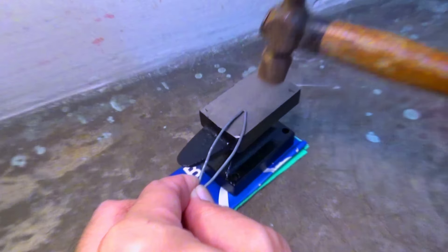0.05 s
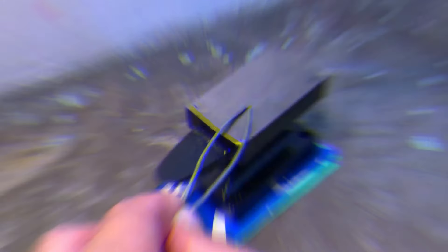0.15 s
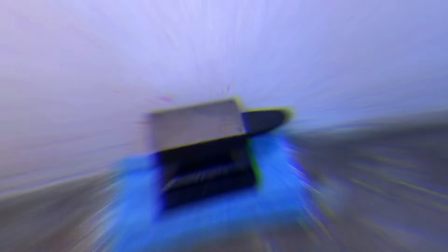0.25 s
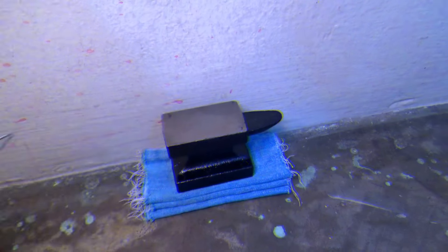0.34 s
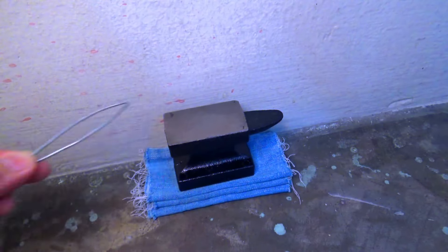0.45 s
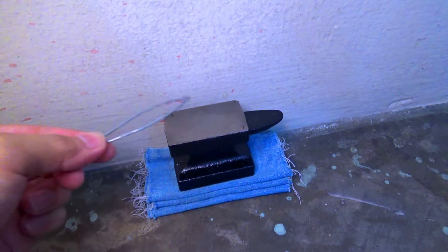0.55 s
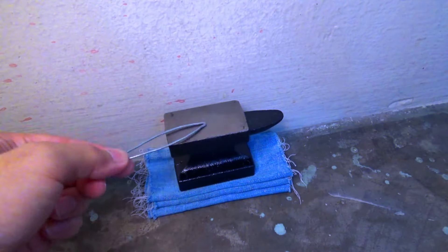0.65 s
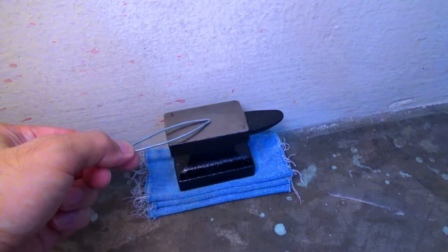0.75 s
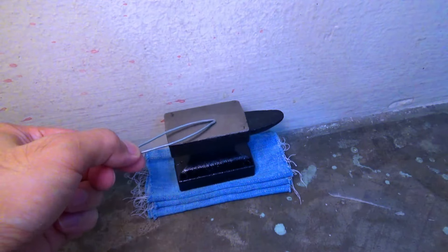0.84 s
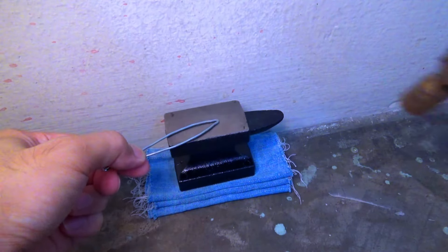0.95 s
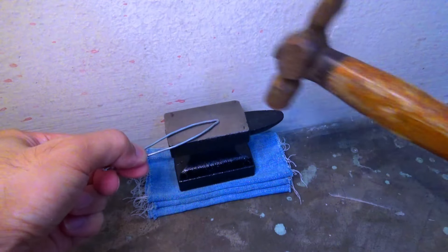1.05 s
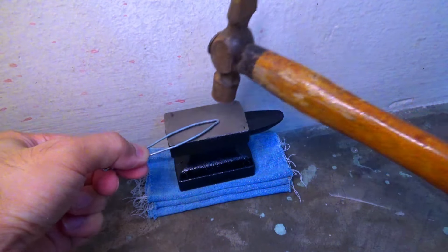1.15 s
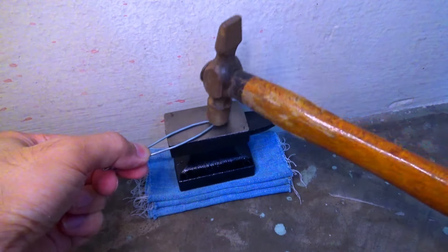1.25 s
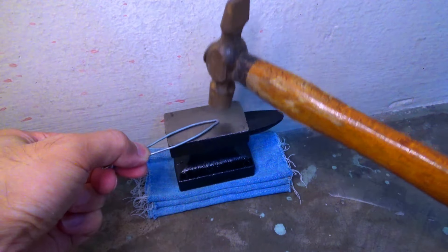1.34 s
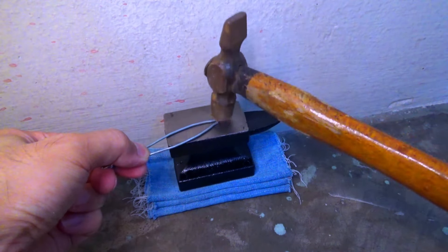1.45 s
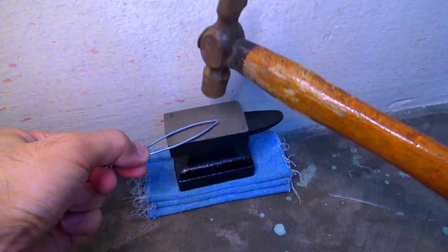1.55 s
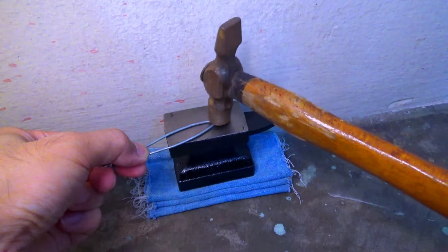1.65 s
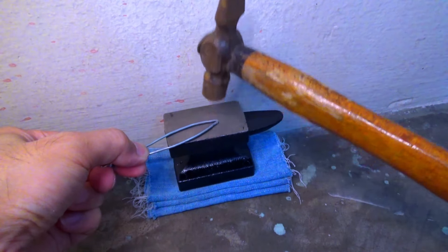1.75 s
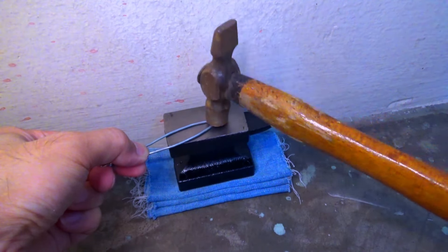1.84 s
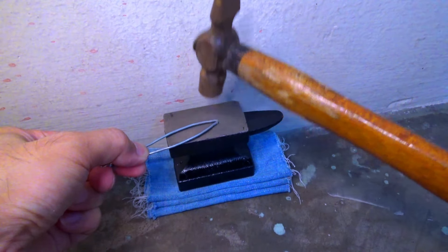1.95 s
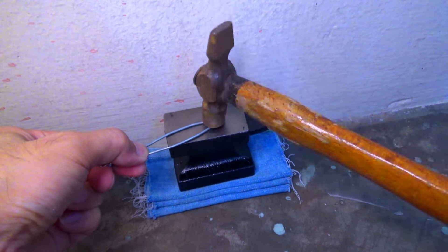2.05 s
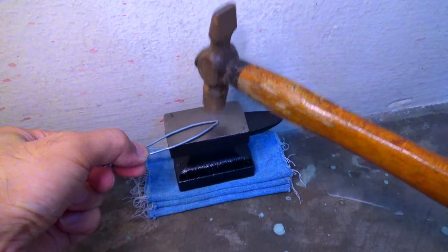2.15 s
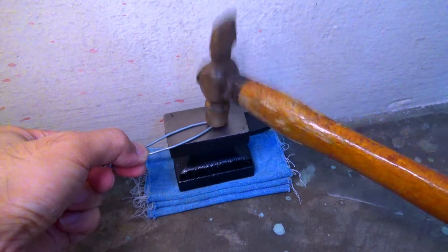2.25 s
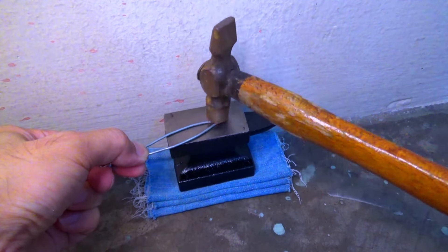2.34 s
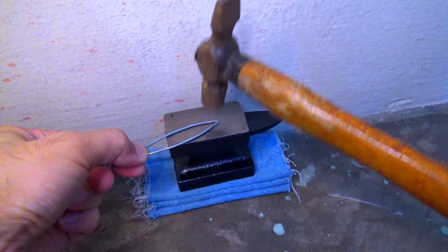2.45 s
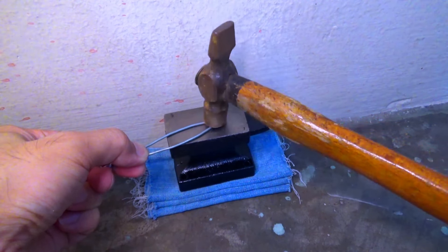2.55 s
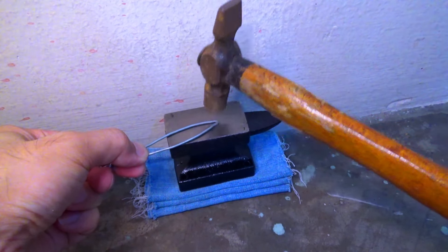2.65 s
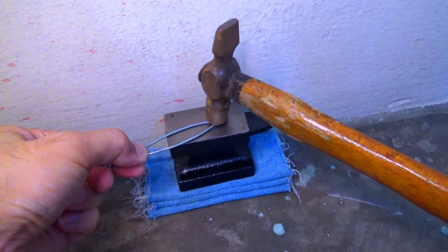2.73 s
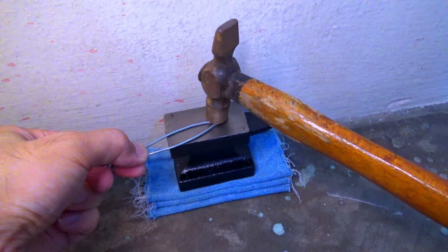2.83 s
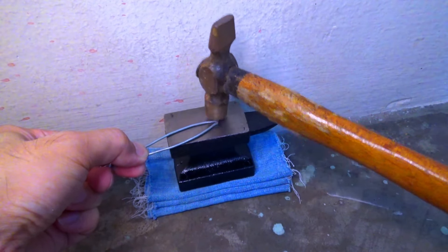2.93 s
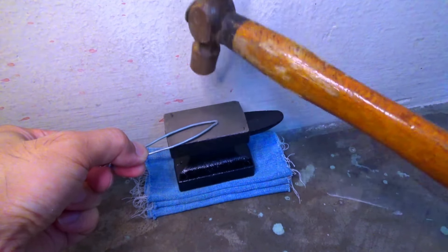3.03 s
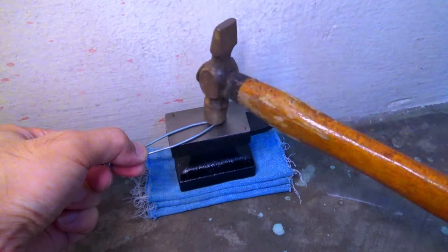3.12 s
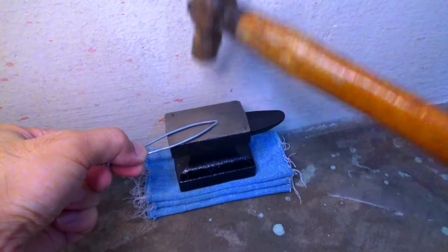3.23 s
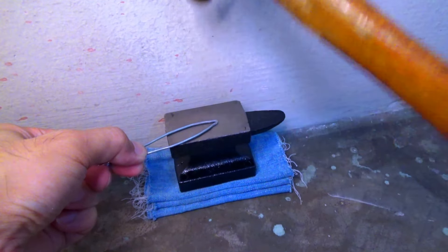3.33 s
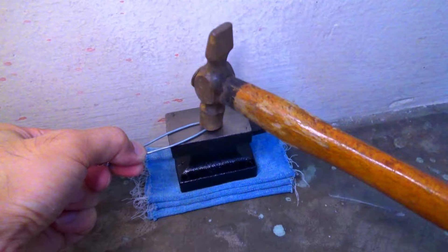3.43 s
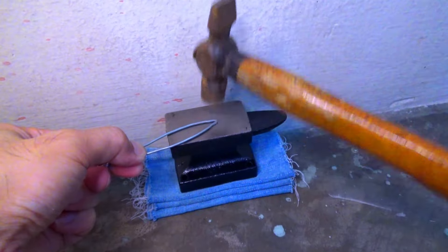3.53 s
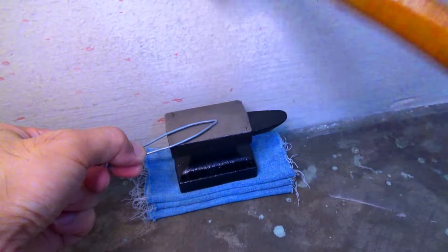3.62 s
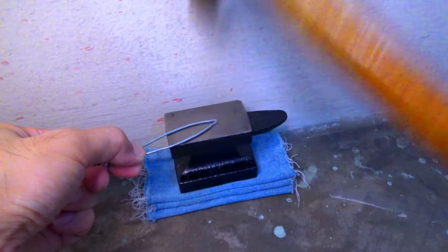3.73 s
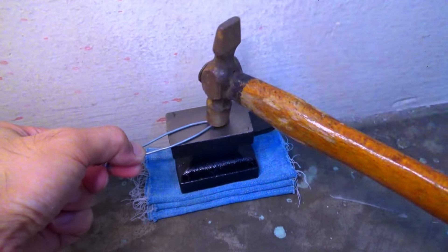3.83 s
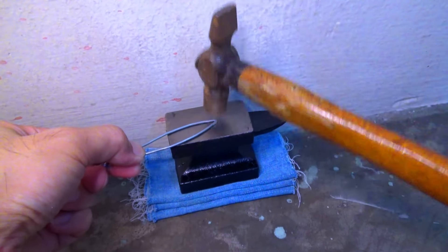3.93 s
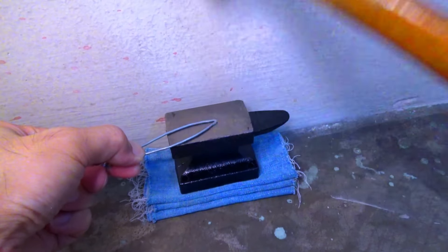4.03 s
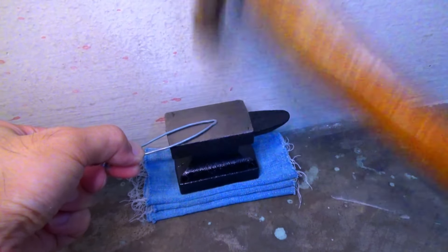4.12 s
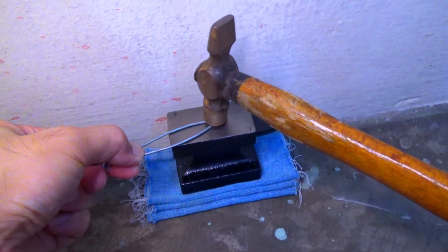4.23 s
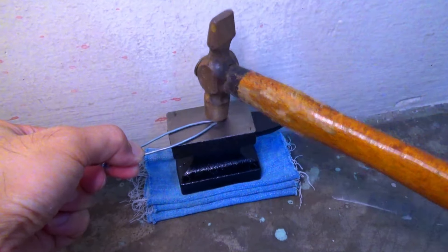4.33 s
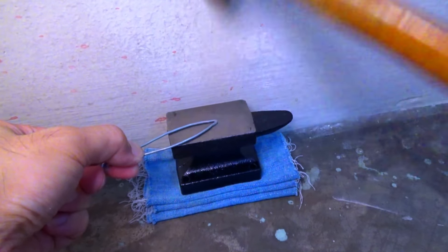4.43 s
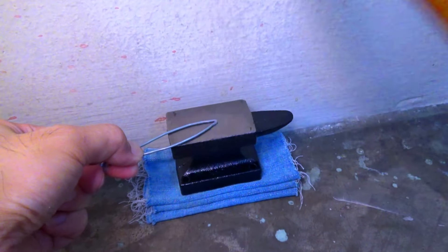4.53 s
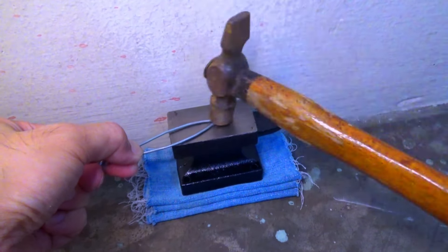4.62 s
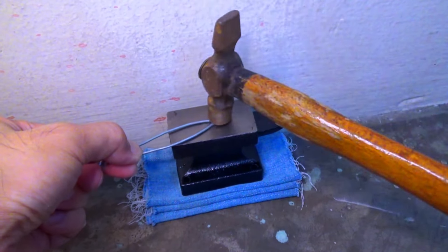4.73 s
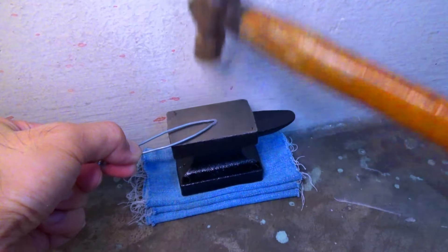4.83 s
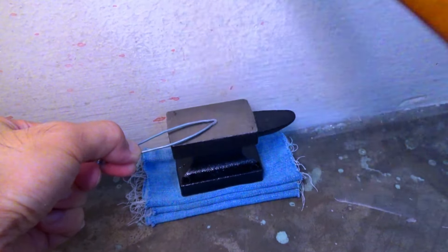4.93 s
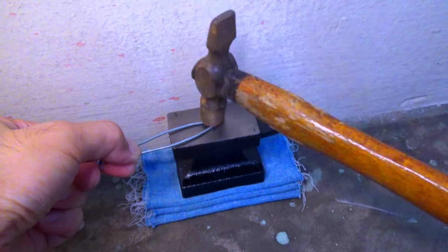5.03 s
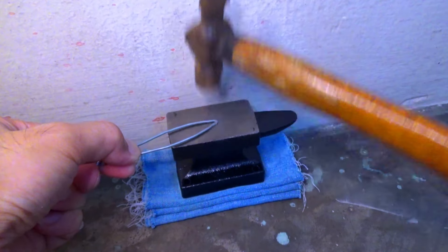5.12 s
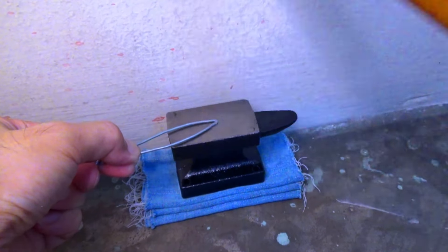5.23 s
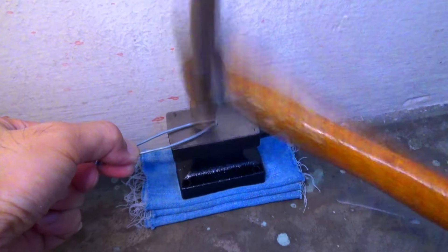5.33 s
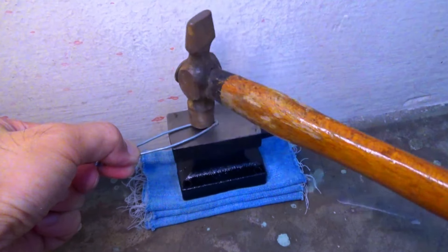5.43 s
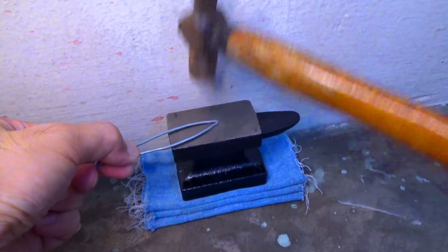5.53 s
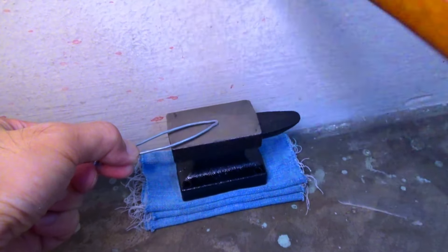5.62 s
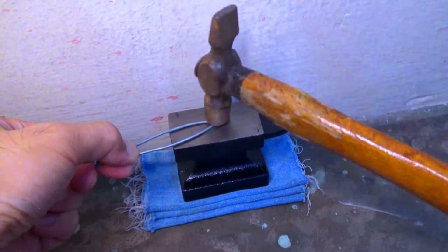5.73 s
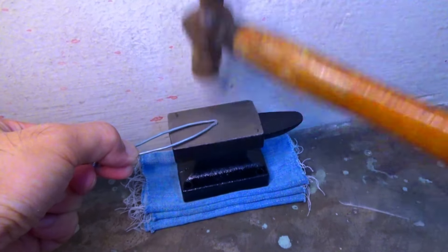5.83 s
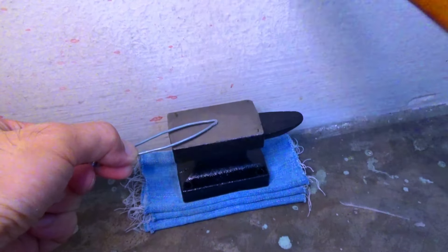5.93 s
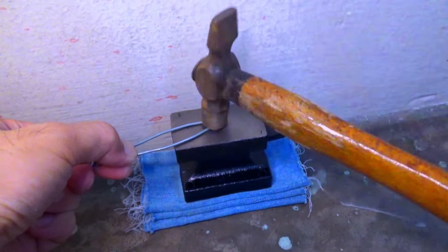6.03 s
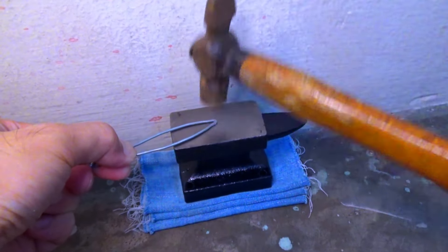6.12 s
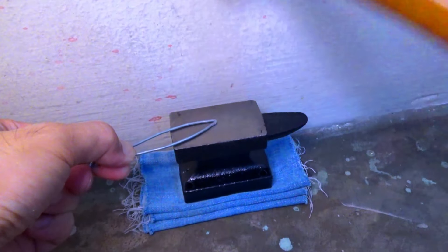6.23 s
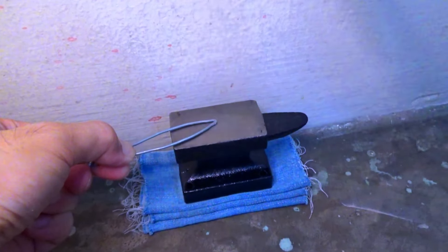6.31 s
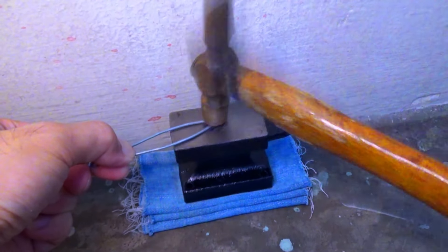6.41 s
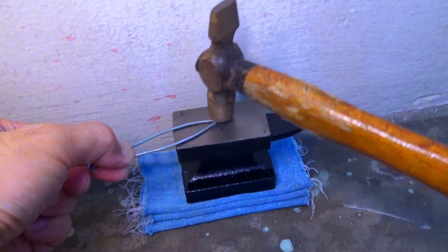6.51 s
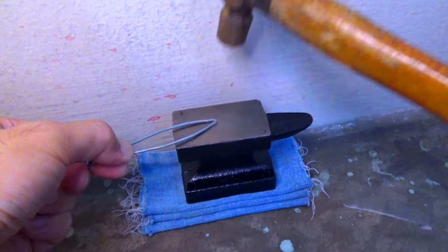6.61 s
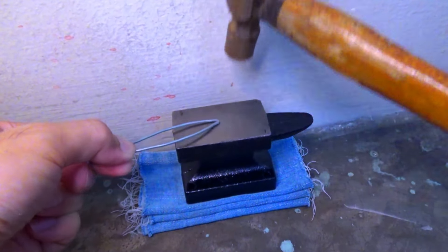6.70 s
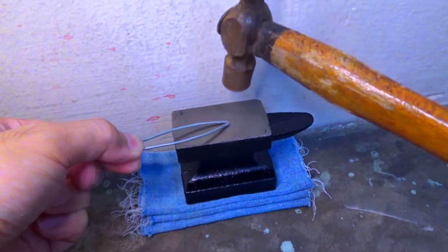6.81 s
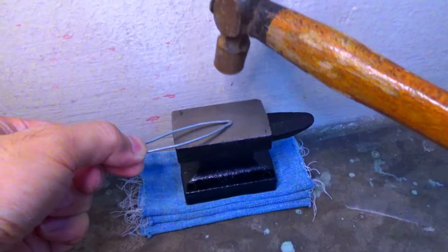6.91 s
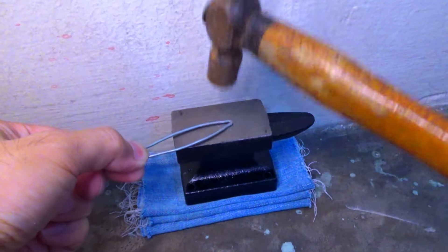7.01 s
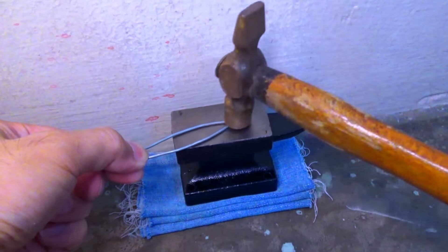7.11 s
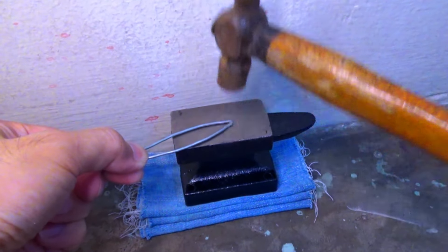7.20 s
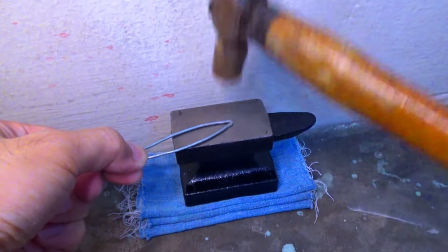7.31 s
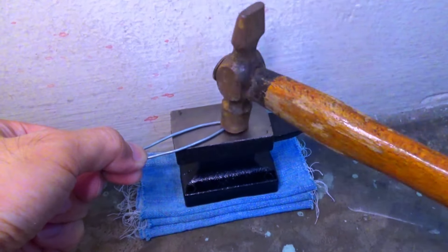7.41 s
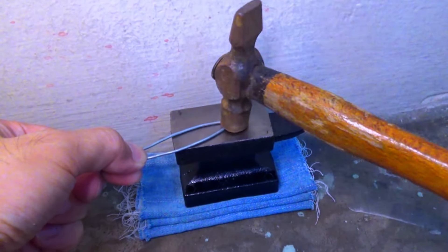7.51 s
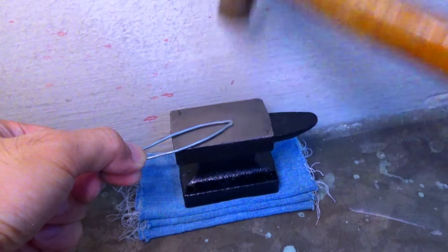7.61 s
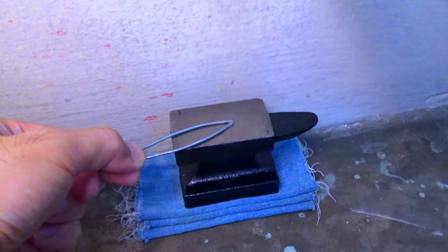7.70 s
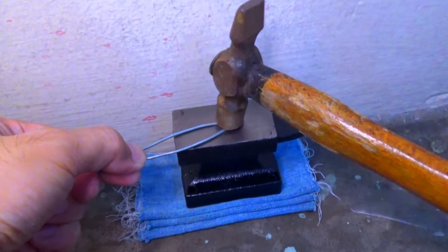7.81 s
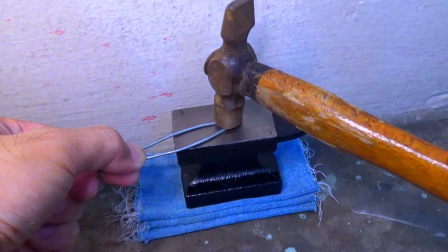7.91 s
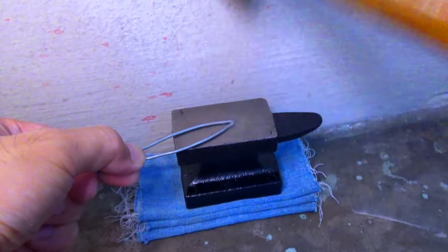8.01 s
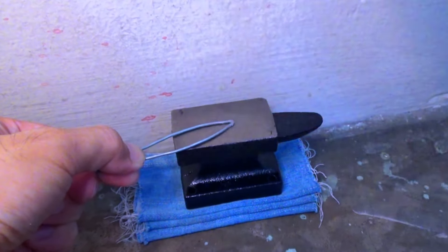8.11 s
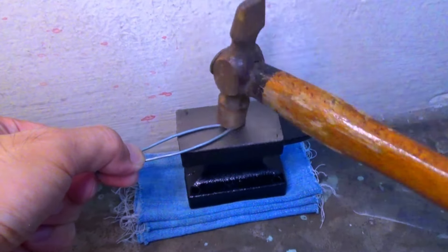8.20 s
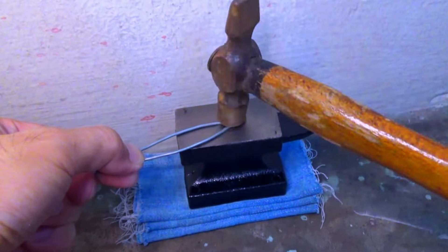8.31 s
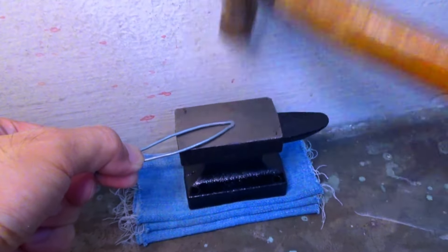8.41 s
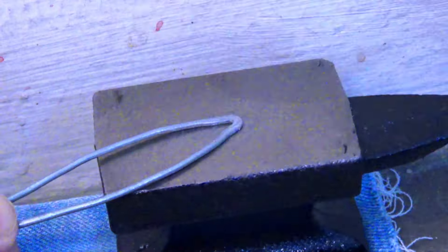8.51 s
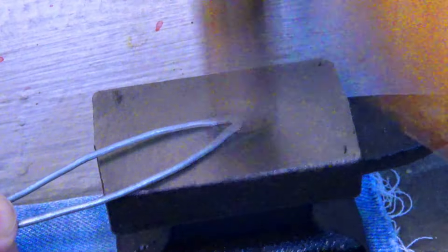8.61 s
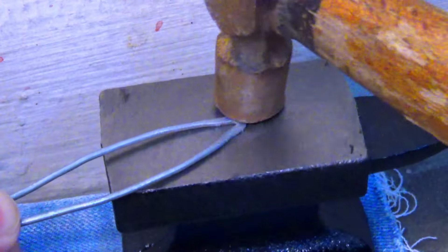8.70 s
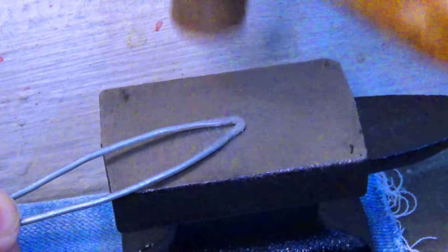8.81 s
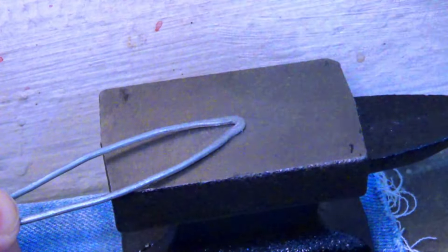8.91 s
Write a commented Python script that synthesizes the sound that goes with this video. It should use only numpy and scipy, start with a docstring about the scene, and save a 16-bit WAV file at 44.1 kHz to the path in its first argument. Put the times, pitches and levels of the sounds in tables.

```python
"""A hammer flattens a loop of steel wire on a small anvil that stands on a cloth, heard close on two microphones
in a bare, echoing workshop. After an opening blow come light aiming taps, then mostly heavy swings.
Each blow is a filtered noise crack plus brief high steel modes; decaying stereo noise is the room's loud answer.
Filtered noise makes the clacks, wire slides and soft murmur; the recorder's limiter holds heavy blows down."""
import sys
import numpy as np
from scipy import signal
from scipy.fft import rfft, irfft
from scipy.io import wavfile
from scipy.ndimage import uniform_filter1d

SR = 44100
rng = np.random.default_rng(int(sys.argv[2]) if len(sys.argv) > 2 else 0)


def materialize(psi):
    """Save the field psi as 16-bit PCM at rate SR to the path in sys.argv[1].

    A 1-D psi becomes a single channel; in a 2-D psi each row is a channel.
    """
    bounded = np.clip(np.atleast_2d(psi).T, -1, 1)
    quanta = np.round(bounded * 32767).astype(np.int16)
    wavfile.write(sys.argv[1], SR, quanta)


N = 394694
TIME = np.arange(N) / SR
TAIL = 2 ** 15  # samples in one blow's decay

# Hammer blows; the landing spot decides how each note rings.
# Each row: start in seconds, force in dB, low steel note in dB, middle steel note in dB, notes relative to the force.
BLOWS = [(0.001, -7, -34, -7), (1.4712, -15.5, -3, -11), (1.691, -12.5, 4, -4), (1.906, -11.5, 5, -3),
         (2.1067, -9, 10, 0.5), (2.317, -8.5, 7, -3.5), (2.5418, -9, 7, 2), (2.7438, -11.5, 6.5, -5.5),
         (3.1605, -6, 10.5, -3), (3.4534, -4.5, 10.5, -6), (3.8245, -4.5, 5.5, -5),
         (4.2175, -3.5, -3.5, -4), (4.6538, -3.5, 5.5, -2), (5.0653, -5.5, 7, 7), (5.4, -5.5, 4, -12),
         (5.7656, -4.5, 4, 6.5), (6.064, -4, 0.5, 6.5), (6.4769, -4.5, -7, 14), (7.1218, -14, 8.5, -4),
         (7.409, -11, 1, -1), (7.824, -4, 4, 4.5), (8.2416, -4, 7, 6), (8.682, -5.5, -5, 5.5)]
# Modes of anvil and hammer head. Each row: frequency in Hz, relative level in dB, t60 in seconds before damping.
STEEL_MODES = [(4010, -34, .05), (4569, -17, .11), (7468, -14, .075), (10707, -29, .07), (11115, -23, .08),
               (13400, -37, .1), (14610, -42, .09), (14990, -37, .09)]
# Borders in Hz between the lowest, low, middle and top steel notes.
NOTE_BORDERS_HZ = [4300, 6800, 9000]
# Weak, longer notes that hang on under the crash. Each row: frequency in Hz, relative level in dB, t60 in seconds.
AFTER_RING = [(1388, -29, .35), (1727, -33, .35), (1892, -35, .33), (1975, -31, .36), (2444, -33, .32),
              (3571, -31, .3), (3600, -32, .3), (3686, -33, .3), (4016, -30, .3), (4339, -32, .3),
              (6290, -34, .3), (7843, -32, .3)]
# Colour of the crack close by. Each row: frequency in Hz, relative density in dB per Hz.
CRACK_COLOUR = [(40, -28.5), (150, -41), (330, -31), (650, -1.5), (1100, -9.5), (2000, -4), (3700, 4.5),
                (5200, 2), (7500, 7.5), (10000, 12), (11800, -1.5), (16000, 12)]
# Distinct reflections from floor and walls. Each row: delay in seconds, level in dB below the direct path.
ECHOES = [(.0009, -5), (.0028, -6), (.0082, -15), (.0378, -14)]
# Colour of the room's answer. Each row: frequency in Hz, relative density in dB per Hz.
ROOM_COLOUR = [(60, -44), (130, -16.5), (260, -10.5), (330, -14.5), (420, -13.5), (700, -5.5), (1300, -2),
               (2000, 2.5), (2800, 2), (3900, 3.5), (5100, 1.5), (7500, 7.5), (10000, 5.5), (11800, -5),
               (16000, -4.5)]
# Reverberation. Each row: frequency in Hz, t60 in seconds.
ROOM_T60 = [(150, 0.75), (530, 0.45), (1400, 0.41), (3700, 0.41), (9700, 0.36), (16000, 0.33)]
# Broad resonances of the damped hammer and anvil that colour the crash.
# Each row: centre in Hz, width in Hz, boost in dB.
BODY = [(401, 38, 10), (936, 26, 8.5), (1300, 143, 5), (1904, 190, 5.5), (3760, 530, 3.5), (6060, 310, 4),
        (9660, 410, 2.5)]
# Likeness of the two microphones in the diffuse field. Each row: frequency in Hz, correlation from 0 to 1.
LIKENESS = [(100, 1), (500, 0.97), (1000, 0.83), (2000, 0.65), (4000, 0.65), (8000, 0.78), (12000, 1)]
# The opening blow lands with the anvil on a harder pad, which clanks.
# Each row: frequency in Hz, relative level in dB, t60 in seconds.
PAD_MODES = [(720, -11, 0.56), (835, 1.5, 0.32), (1060, -11, 0.69), (1190, -2, .18), (1886, 2, 0.34),
             (2160, 9, 0.077), (2250, 8, 0.092)]
# Light clacks on the anvil: touches of wire and hammer, and one knock of the anvil landing again just after a
# blow. Each row: start in seconds, relative level in dB, centre in Hz, t60 in seconds.
TOUCHES = [(0.7393, -27, 5970, 0.024), (1.355, -13, 1050, 0.019), (2.763, -6.5, 1880, 0.041),
           (2.873, -12.5, 1140, 0.046)]
# The wire slides on the anvil face. Each row: middle in seconds, length in seconds, level in dB, centre in Hz.
SLIDES = [(0.873, 0.084, -58, 2160), (1.025, 0.077, -59, 4000)]
# Colour of the background. Each row: frequency in Hz, relative density in dB per Hz.
AIR_COLOUR = [(25, -22), (55, -10), (95, -16.5), (135, -2), (230, -2), (320, -4.5), (400, -3), (500, -7.5),
              (850, -0.5), (1600, -7), (2500, -11.5), (6300, -22.5), (10000, -27), (15000, -46)]
# Course of the background's low murmur. Each row: time in seconds, relative level in dB.
MURMUR_COURSE = [(0.4, -63), (0.8, -60), (2.09, -55), (7.73, -58), (8.95, -52.5)]
# Faint, unsteady tones. Each row: middle in seconds, length in seconds, frequency in Hz, level in dB.
TONES = [(.87, .09, 1375, -49), (.865, .07, 2160, -53), (7.88, .9, 58, -66), (8.9, .11, 930, -49)]

# the contact gets brighter with force, and with every blow that flattens and hardens the wire
CONTACT_HZ, OCTAVES_PER_DB, OCTAVES_PER_BLOW = 8800, 0.1353, 0.033  # corner at 0 dB force, first blow
# only heavy blows shake the floor: the bass edge of the room's answer sinks as the force rises
BASS_EDGE_HZ, BASS_OCTAVES_PER_DB = 72, .2  # edge at 0 dB force
# the top steel notes take a share of the low note's swing
TOP_RING_DB, TOP_FOLLOWS = -3.5, 0.52
# after each blow the anvil hops on its cloth and knocks down again, which damps its ring
HOP_S, HOP_SPREAD_S, HOP_DB, HOP_T60_S = .03, .005, -3.5, 0.042
KNOCK_LOW_HZ, KNOCK_HIGH_HZ, DAMPED_T60_S = 480, 1600, .22
TICK_HZ, TICK_DB, TICK_T60_S = 2400, -5, .019
# everything drops out briefly, then fades back in
DIP_S, DIP_FALL_S, DIP_RISE_S = 0.307, .014, 0.036


def hammer(crack_db, ring_db, room_db, ring_room_db, after_db, snap):
    """Crack and room crash, dulled by a soft contact, the steel modes the landing spot favours, then the hop."""
    out, steel, after = np.zeros((2, N)), modes(STEEL_MODES), modes(AFTER_RING)
    group = np.searchsorted(NOTE_BORDERS_HZ, np.array(STEEL_MODES)[:, 0])
    for earlier_blows, (s, force_db, low_db, middle_db) in enumerate(BLOWS):
        room = from_db(room_db) * workshop(build_s=0.01)
        # light taps are mostly snap; only heavy blows fill the room
        crack = from_db(crack_db - snap * force_db) * contact(crush=0.63, crush_t60=0.015)

        corner_hz = CONTACT_HZ * 2 ** (OCTAVES_PER_DB * force_db + OCTAVES_PER_BLOW * earlier_blows)
        softness = signal.butter(2, min(corner_hz, .45 * SR), fs=SR)
        bass_edge_hz = BASS_EDGE_HZ * 2 ** (-BASS_OCTAVES_PER_DB * force_db)
        thinness = signal.butter(2, bass_edge_hz, "high", fs=SR)
        answer = signal.lfilter(*thinness, room)
        crash = signal.lfilter(*softness, crack + answer + strike(after, after_db))

        spot_db = np.array([0, low_db, middle_db, TOP_RING_DB + TOP_FOLLOWS * low_db])
        delay, knock = hop(force_db)
        damping = dying(np.maximum(TIME[:TAIL] - delay, 0), DAMPED_T60_S)
        ring = strike(steel, ring_db + spot_db[group]) * damping
        ring_in_room = from_db(ring_room_db) * through(ring, room)
        add(out, s, from_db(force_db) * (crash + ring + ring_in_room))
        add(out, s + delay, knock)
    return out


def contact(crush, crush_t60):
    """The near crack: one sharp push, then a few milliseconds of grit as the wire gives."""
    grit = rng.standard_normal(TAIL) * dying(TIME[:TAIL], crush_t60)
    push = crush * grit / np.linalg.norm(grit)
    push[0] += 1
    return signal.fftconvolve(push / np.linalg.norm(push), near_paths())[:TAIL]


def near_paths():
    """The crack's colour by the direct path and its first reflections."""
    response = np.zeros(TAIL)
    response[0] = 1
    for delay, db in ECHOES:
        response[round(delay * SR)] += from_db(db)
    return signal.fftconvolve(response, causal_pulse(CRACK_COLOUR))[:TAIL]


def modes(table):
    """One decaying sine per row."""
    hz, db, t60 = np.transpose(table)[:, :, None]
    return from_db(db) * np.sin(2 * np.pi * hz * TIME[:TAIL]) * dying(TIME[:TAIL], t60)


def strike(sines, db):
    """Sum the modes, each a little stronger or weaker from blow to blow."""
    scatter_db = rng.normal(0, 2, len(sines))
    return from_db(db + scatter_db) @ sines


def hop(force_db):
    """The anvil lands again with a tick and a dull knock; also gives the delay after the blow."""
    noise, t = rng.standard_normal((2, TAIL)), TIME[:TAIL]
    dull = signal.butter(2, [KNOCK_LOW_HZ, KNOCK_HIGH_HZ], "band", fs=SR, output="sos")
    knock = signal.sosfilt(dull, noise[0] * dying(t, HOP_T60_S))
    tick = noise[1] * dying(t, TICK_T60_S)
    tick = from_db(TICK_DB) * broad_band(broad_band(tick, TICK_HZ), TICK_HZ)
    delay = HOP_S + HOP_SPREAD_S * rng.uniform(-1, 1)
    return delay, from_db(force_db + HOP_DB) * (knock + tick)


def workshop(build_s):
    """Diffuse response, new for each pose of arm and hammer: it builds up, then each band dies at its own rate."""
    t = TIME[:TAIL]
    noise, hz = diffuse(ROOM_COLOUR, TAIL)
    body_db = sum(db / (1 + (2 * (hz - centre) / width) ** 2) for centre, width, db in BODY)
    noise = noise * from_db(body_db)
    edges = np.array([0, 300, 800, 2400, 6000, 11500, SR / 2])  # Hz
    tail = np.zeros((2, TAIL))
    for low, high in zip(edges, edges[1:]):
        band = irfft(noise * (hz >= low) * (hz < high))
        tail += band * dying(t, at_hz(ROOM_T60, (low + high) / 2))
    # reflections arrive in clumps a few milliseconds long
    clump_db = 0.75
    clumps = from_db(clump_db * rms_one(uniform_filter1d(rng.standard_normal(TAIL), size=130)))
    return tail * clumps * (1 - np.exp(-t / build_s))


def pad_clank(level_db):
    """Lower, uneven notes of the pad under the opening blow."""
    out = np.zeros((2, N))
    add(out, BLOWS[0][0], strike(modes(PAD_MODES), level_db))
    return out


def touches(room_db):
    """Small, dry clacks of wire and hammer settling, and of the anvil landing again: short band-limited noise
    with a little room."""
    out = np.zeros((2, N))
    for s, db, hz, t60 in TOUCHES:
        clack = rng.standard_normal(TAIL) * dying(TIME[:TAIL], t60)
        in_room = clack + from_db(room_db) * workshop(build_s=0.019)
        add(out, s, from_db(db) * broad_band(broad_band(in_room, hz), hz))
    return out


def slides():
    """Soft friction noise while the wire is moved into place."""
    out = np.zeros(N)
    for s, length, db, hz in SLIDES:
        friction = rms_one(broad_band(rng.standard_normal(N), hz))
        out += from_db(db) * swell(s, length) * friction
    return out


def background(width, above_murmur_db):
    """Soft diffuse noise; the faint tones are narrow noise, so their level and pitch waver."""
    murmur_db = above_murmur_db + np.interp(TIME, *np.transpose(MURMUR_COURSE))
    out = rms_one(irfft(diffuse(AIR_COLOUR, N)[0], N)) * from_db(murmur_db)
    for s, length, hz, db in TONES:
        # width is a fraction of the tone's frequency
        tone = signal.lfilter(*signal.iirpeak(hz, 1 / width, fs=SR), rng.standard_normal(N))
        out = out + from_db(db) * swell(s, length) * rms_one(tone)
    return out


def diffuse(spectrum, size):
    """Spectrum of stereo noise arriving from all sides, and its frequencies."""
    hz = np.fft.rfftfreq(size, 1 / SR)
    alike = np.clip(at_hz(LIKENESS, hz), 0, 1)
    mid, side = rfft(rng.standard_normal((2, size)))
    pair = np.sqrt((1 + alike) / 2) * mid + np.sqrt((1 - alike) / 2) * side * [[1], [-1]]
    return pair * from_db(at_hz(spectrum, hz)), hz


def causal_pulse(spectrum, size=2048):
    """The most compact pulse with this colour (minimum phase): nothing sounds before its start."""
    cepstrum = irfft(np.log(from_db(at_hz(spectrum, np.fft.rfftfreq(size, 1 / SR)))))
    cepstrum[1:size // 2] *= 2
    cepstrum[size // 2 + 1:] = 0
    return irfft(np.exp(rfft(cepstrum)))


def broad_band(x, hz):
    """Keep about two and a half octaves around a centre."""
    return signal.lfilter(*signal.butter(1, [hz / 2.4, min(hz * 2.4, .4 * SR)], "band", fs=SR), x)


def swell(s, length):
    """A smooth rise and fall centred on time s."""
    return np.cos(np.pi * np.clip((TIME - s) / length, -.5, .5))


def dying(t, t60):
    """Exponential decay by 60 dB in t60 seconds."""
    return np.exp(-np.log(1000) * t / t60)


def through(x, response):
    """Pass a mono sound through a stereo response."""
    return signal.fftconvolve(x[None], response, axes=1)[:, :TAIL]


def add(track, s, sound):
    """Mix a sound in at time s."""
    start = max(round(s * SR), 0)
    track[:, start:start + sound.shape[-1]] += sound[..., :N - start]


def from_db(db):
    """Decibels to amplitude."""
    return 10 ** (np.asarray(db) / 20)


def rms_one(x):
    """Scale to an RMS level of one."""
    return x / np.sqrt(np.mean(x ** 2) + 1e-20)


def at_hz(points, hz):
    """Read a table on a log-frequency axis."""
    at, values = np.transpose(points)
    return np.interp(np.log(np.maximum(hz, 1)), np.log(at), values)


def dip():
    """The level falls to nothing for a moment and comes back."""
    before, after = (DIP_S - TIME) / DIP_FALL_S, (TIME - DIP_S) / DIP_RISE_S
    return np.clip(np.maximum(before, after), 0, 1) ** 2


def scene():
    """Blows, small handling sounds and the quiet workshop."""
    blows = hammer(crack_db=14.5, ring_db=7.5, room_db=-3.5, ring_room_db=-42, after_db=7.0, snap=0.85)
    clank = pad_clank(level_db=-28.5)
    light = touches(room_db=-28.0) + slides()
    quiet = background(width=0.027, above_murmur_db=7)
    return (blows + clank + light + quiet) * dip()


def limiter(x, ceiling_db, release_db_per_s, attack_s):
    """The gain falls when the level passes the ceiling and recovers steadily."""
    power = uniform_filter1d(np.mean(x ** 2, axis=0), size=128)
    over = np.maximum(10 * np.log10(np.maximum(power, 1e-12)) - ceiling_db, 0)
    release = release_db_per_s * TIME
    held = np.maximum.accumulate(over + release) - release
    pole = np.exp(-1 / (attack_s * SR))
    return x * from_db(-signal.lfilter([1 - pole], [1, -pole], held))


def record(dry):
    """A slow limiter levels the crash, a fast one catches the crack; the microphone thins the bass; the top is cut."""
    top, bass_cut_hz, top_cut_hz = .6, 45, 16900  # top is full-scale amplitude; 60 dB down at top_cut_hz
    level = limiter(dry, ceiling_db=-15.5, release_db_per_s=302, attack_s=0.015)
    held = limiter(level, ceiling_db=-12.0, release_db_per_s=915, attack_s=0.00015)
    rounded = top * np.tanh(held / top)
    thinned = signal.lfilter(*signal.butter(1, bass_cut_hz, "high", fs=SR), rounded)
    return signal.sosfilt(signal.cheby2(14, 60, top_cut_hz, fs=SR, output="sos"), thinned)


dry = scene()
out = record(dry)
materialize(out)
```